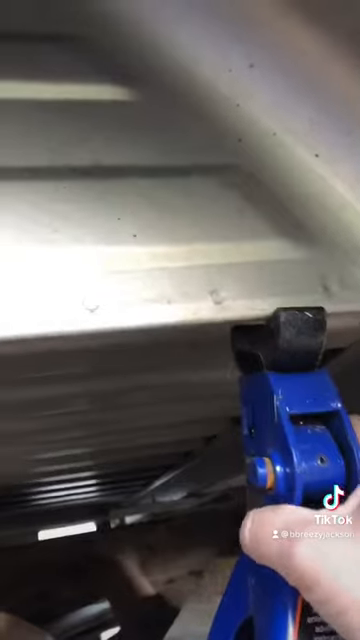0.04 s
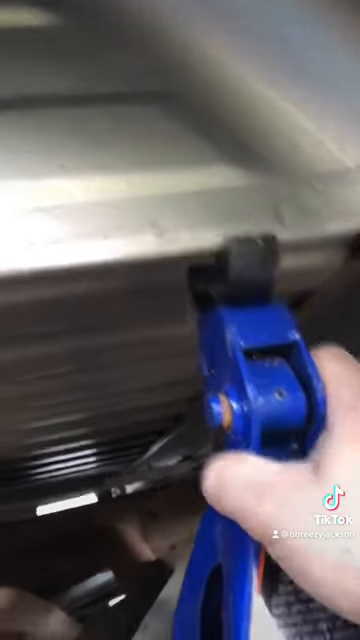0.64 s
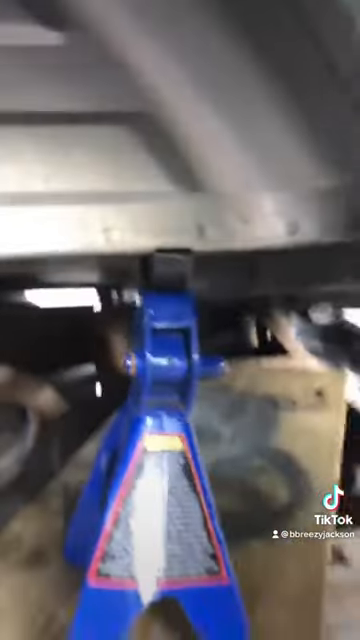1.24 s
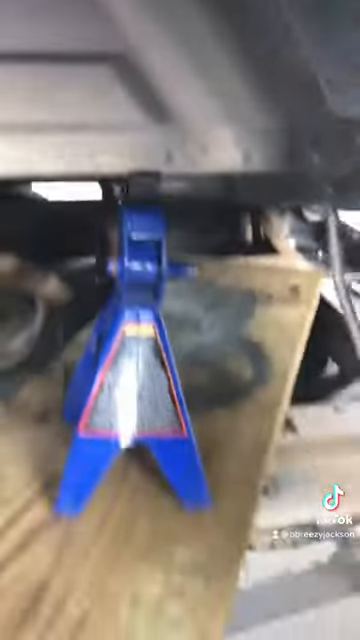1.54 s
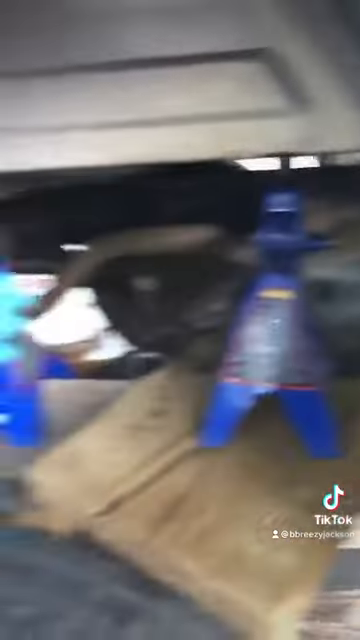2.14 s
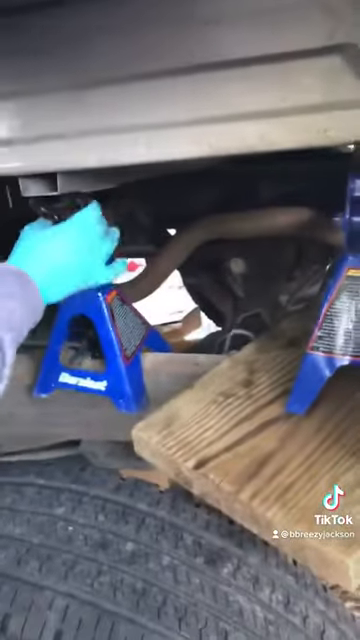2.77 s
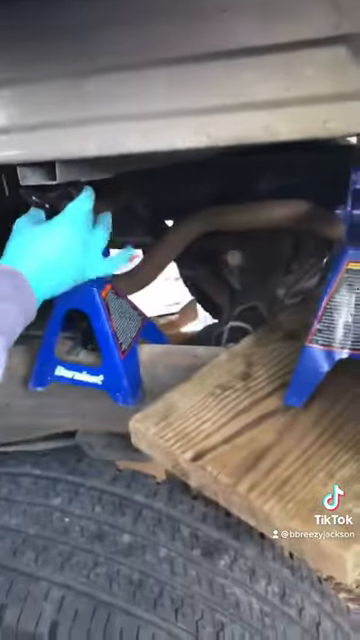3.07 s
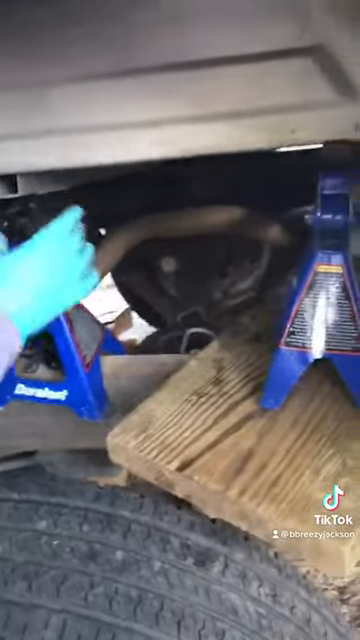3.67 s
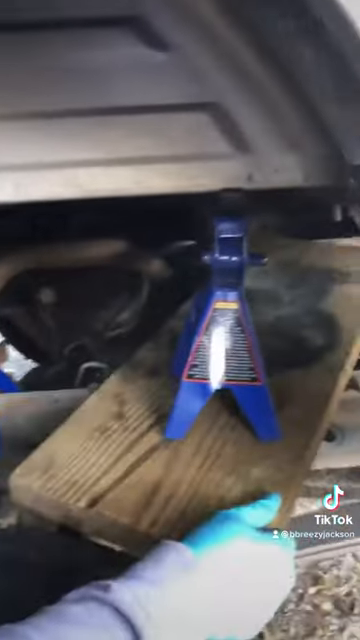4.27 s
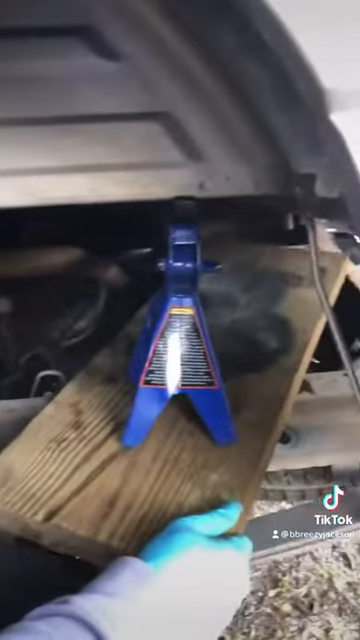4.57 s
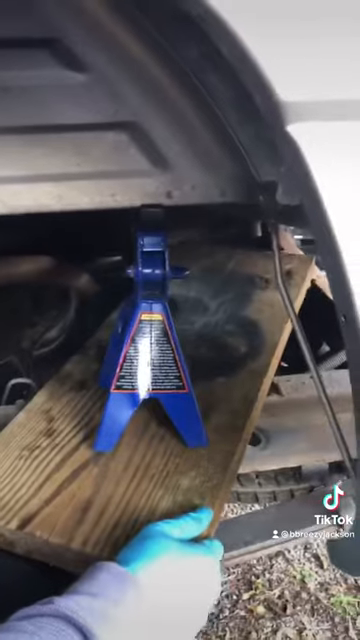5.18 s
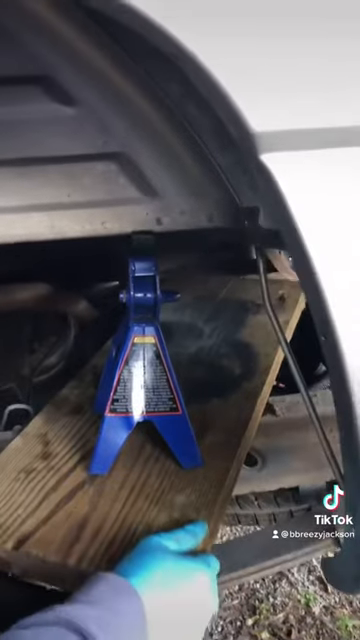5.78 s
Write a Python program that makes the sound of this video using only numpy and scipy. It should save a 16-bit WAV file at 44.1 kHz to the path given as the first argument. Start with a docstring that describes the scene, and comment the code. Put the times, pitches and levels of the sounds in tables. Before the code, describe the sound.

The sound opens with a few soft knocks and light scuffs, close by, as a steel jack stand is moved on a wooden board under a raised truck. From about 1 to 1.7 seconds the stand clunks and rattles in two quick clusters, with short ratchet pings and the sharpest clank near 1.6 seconds. A second stand knocks at about 2.3 seconds, lands with a hard ringing clunk at 3 seconds and clunks again near 3.4. Each impact dies away quickly with a slight hollow ring. The board then takes over, with brief scuffs and dull, low thuds at about 3.5 and 4.2 seconds, and three more between 5.2 and 5.8, the middle one strongest. A quiet outdoor rumble continues throughout, with very faint pulsing insect trills and a distant bird whistling near 0.5, 2.1 and 5.2 seconds.

```python
"""Steel jack stands clunk and rattle as they are shifted on a board under a raised truck, close by.
Each impact excites damped modes of the steel and of the underbody panels; a ratchet pawl pings.
The board thuds in bending and scuffs by stick-slip friction, and the underbody reflects its thuds.
Behind them, insects trill in pulses and a far bird whistles over a low outdoor rumble."""
import sys
import numpy as np
from scipy import signal
from scipy.fft import rfft, irfft
from scipy.io import wavfile
from scipy.ndimage import uniform_filter1d

SR = 44100
rng = np.random.default_rng(int(sys.argv[2]) if len(sys.argv) > 2 else 0)


def generate_wav(signal):
    """Clip the signal to [-1, 1] and save it as 16-bit WAV at the path in sys.argv[1]."""
    frames = np.transpose(np.atleast_2d(signal))
    scaled = np.clip(frames, -1, 1) * 32767
    pcm = np.round(scaled).astype(np.int16)
    wavfile.write(sys.argv[1], SR, pcm)


N = 261098
BANDS_HZ = np.geomspace(40, 16000, 22)


# impacts: t/s, level/dB, weight on the board/dB, brightness/(dB/octave), favoured mode f/Hz
BLOWS = [(0.097, -43, 2, -2.5, 165), (0.374, -34, -8, -3, 724), (0.913, -33.5, -12, -6, 812),
         (1.034, -28.5, 4, 1, 133), (1.044, -17.5, -3, 4, 400), (1.059, -16, 3.5, 4.5, 352),
         (1.082, -20, -3, -5.5, 353), (1.147, -26.5, -2, -2, 214), (1.244, -22, -3, -.5, 171),
         (1.276, -16.5, -4, -7, 818), (1.437, -33, 3, -2.5, 203), (1.455, -24.5, -3, -5.5, 259),
         (1.474, -21.5, 2, 4.5, 670), (1.519, -32, 8, -5.5, 163), (1.56, -24.5, 1.5, -1.5, 145),
         (1.587, -19.5, -1.5, 5.5, 1257), (1.604, -13, -6, 3, 1330), (1.628, -21, -5, 1, 570.5),
         (1.645, -22.5, -1, -1, 254), (2.256, -29, 1, -1, 829), (2.265, -21.5, -3, -3.5, 703),
         (2.763, -42, 1, -2.5, 324), (2.811, -41.5, 0, 7, 751), (2.825, -48, 7, 10.5, 2020),
         (2.911, -37.5, 0, -6.5, 324), (3.014, -18, -1, 1.5, 1107), (3.021, -14.5, -10, -2, 1060),
         (3.328, -29, -1, -7, 650), (3.355, -20, -7.5, -2, 799), (3.485, -34.5, 3.5, 1.5, 190)]
# force spectra of the near stand, which slides, and the far one, set down hard: f/Hz, level/dB
NEAR_FORCE = [(220, -1), (400, 2.5), (680, 0), (1100, -4), (1650, -7), (2300, -18.5), (3300, -24.5),
              (5000, -31), (9000, -31.5)]
FAR_FORCE = [(130, -1), (240, 1.5), (400, -1), (680, 2), (1100, 2), (1650, -5.5), (2600, -17), (4000, -32),
             (9000, -35)]
# how far weight on the board lifts each band: f/Hz, share
WEIGHT_SHARE = [(220, 1), (680, 0)]
# modes of a stand on its board: f/Hz, level/dB, unloaded T60/s
STAND_MODES = [(166.7, -8, 0.54), (248.9, 3.5, 0.21), (317, -27, 0.75), (353, -5.5, 0.25), (422, -16, 0.49),
               (557, -26.5, 0.12), (712, -17, 0.38), (820, -17.5, 0.1), (843, -25, 0.14),
               (1039, -20.5, .25), (1346, -7.5, 0.1), (1620, -13.5, 0.15), (1750, -16, 0.33),
               (2146, -10, 0.11), (2640, -22, 0.059), (2800, -11, 0.052), (3270, -8, .15),
               (3400, -12, 0.12), (3600, -9, 0.2), (4720, -14.5, 0.11), (6300, -29, 0.16),
               (6980, -15.5, 0.11)]
# dense response of stand, board and body panels: f/Hz, band level/dB
PANEL_BANDS = [(45, -26), (80, -20), (120, -12.5), (170, -2), (260, -6), (450, -13.5), (800, -8.5),
               (1400, -11), (2400, -6.5), (3500, -2), (5200, -12), (8000, -19), (12000, -34.5),
               (15000, -42)]
# strength of the mode favoured by the point of contact: f/Hz, level/dB
FAVOURED_GAIN = [(200, -2), (730, -2.5), (1900, -9.5)]

def stands(far_from_s=2.0, load_t60_scale=.86, chatter_hz=130, chatter_s=.12):
    """Impact excitation: the force spectrum of each blow weights the modes of steel and panels."""
    out, t = np.zeros(N), clock(1)
    octaves = np.log2(np.clip(BANDS_HZ, 687, 4000) / 687)  # contact hardness tilts this range
    for s, level, weight, bright, favoured_hz in BLOWS:
        contact, quickest_s = (NEAR_FORCE, .003) if s < far_from_s else (FAR_FORCE, .0018)
        force_db = level + read(contact, BANDS_HZ) + bright * octaves
        force_db += weight * read(WEIGHT_SHARE, BANDS_HZ)
        drive = list(zip(BANDS_HZ, force_db - 5.5))
        # dull blows press in slowly, bright ones graze before they land
        rise = quickest_s + .0005 * max(-bright, 0) + .0003 * max(bright, 0)
        chatter_db = hiss(len(t), 0, chatter_hz) * np.exp(-t / chatter_s)  # the loose post rattles
        panels = dense_modes(force_db + read(PANEL_BANDS, BANDS_HZ), rise, load_t60_scale, early_t60=.1)
        add(out, s, amp(chatter_db - 4.5) * panels)
        for k, (hz, db, t60) in enumerate(STAND_MODES):  # neighbouring modes swing in antiphase
            add(out, s, mode(hz, db + read(drive, hz), t60 * load_t60_scale, rise, turns=k / 2))
        favoured_db = read(FAVOURED_GAIN, favoured_hz) + read(drive, favoured_hz)
        add(out, s, mode(favoured_hz, favoured_db, .21 * load_t60_scale, rise, turns=1 / 4))
    return out


def mode(hz, db, t60, rise, turns):
    """Damped harmonic oscillator: it builds up, then decays exponentially; turns is its initial phase."""
    t = clock(1)
    swell = 1 - np.exp(-(t / (rise + 1 / hz)) ** 2)
    return swell * amp(db - 60 * t / t60) * np.sin(2 * np.pi * (hz * t + turns))


# ring between ground and underbody: f/Hz, unscaled T60/s
RING_DECAY = [(100, 0.72), (260, 0.83), (700, 0.48), (1840, 0.25), (4850, 0.18), (12000, 0.26)]

def dense_modes(levels_db, rise, t60_scale, early_t60, early_db=2, uneven_db=5, cluster_hz=70):
    """Modal overlap: countless close modes merge into noise bands, a quick burst over a longer ring."""
    t, bins, hz = clock(1), SR // 2, BANDS_HZ[:, None]
    index = np.arange(len(BANDS_HZ))
    place = np.interp(np.log(np.arange(bins) + 1), np.log(BANDS_HZ), index)
    band_share = np.maximum(1 - abs(place - index[:, None]), 0)
    # each point of contact favours other clusters of the higher modes
    clusters = unit(uniform_filter1d(rng.standard_normal(bins), cluster_hz))
    clusters *= np.minimum(np.arange(bins) / 1000, 1)
    spectrum = amp(uneven_db * clusters) * np.exp(2j * np.pi * rng.random(bins))
    swell = 1 - np.exp(-(t / (rise + .58 / hz)) ** 2)  # low modes take longer to build up
    ring = amp(-60 * t / (t60_scale * read(RING_DECAY, hz)))
    burst = amp(early_db - 60 * t / early_t60)
    envelope = swell * (ring + burst) / (1 + amp(early_db))
    bands = irfft(np.sqrt(band_share) * spectrum, SR) * envelope
    bands *= np.sqrt((envelope ** 2).sum(1) / (bands ** 2).sum(1))[:, None]  # the envelope sets the energy
    return amp(levels_db) @ bands


# soft blows on the board: t/s, level/dB
BOARD_THUDS = [(0.150, -35.5), (0.418, -29.5), (0.626, -32.5), (1.063, -24.5), (3.492, -21.5), (4.016, -34),
               (4.2037, -16.5), (5.2612, -20), (5.4871, -11.5), (5.741, -18.5)]
# ring after a thud: f/Hz, band level/dB
THUD_BANDS = [(45, -9.5), (75, -14), (140, 1.5), (220, -11), (320, -5.5), (480, -17), (800, -25),
              (1500, -41.5), (4000, -71)]

def board(swing_hz=(113, 215), lowest_hz=146, lowest_t60=.67, echo_s=.028, echo_db=-15):
    """Flexural vibration: a tapped plank makes a few damped swings; the underbody echoes and drones."""
    out, t = np.zeros(N), clock(.88)
    bending = signal.butter(3, swing_hz, "band", fs=SR, output="sos")
    swing = signal.sosfilt(bending, signal.unit_impulse(len(t)))
    swing /= abs(swing).max()
    hum = amp(-19 - 60 * t / lowest_t60) * np.sin(2 * np.pi * lowest_hz * t)  # lowest mode of the plank
    hum *= 1 - np.exp(-t * lowest_hz / 2)
    for s, db in BOARD_THUDS:
        add(out, s, tick(db - 28, hz=740, t60=.06))
        add(out, s, amp(db) * (swing + hum))
        add(out, s + echo_s, amp(db + echo_db) * swing)
        drone_db = db - 9 + read(THUD_BANDS, BANDS_HZ)
        add(out, s + .00411, dense_modes(drone_db, rise=.0028, t60_scale=.92, early_t60=.054))
    return out


# pings of the ratchet pawl and loose steel: t/s, f/Hz, level/dB, T60/s
STEEL_PINGS = [(1.48, 2676, -37.5, .14), (1.612, 1338, -21, .12), (1.628, 4730, -43, .15),
               (2.814, 4900, -59, .18), (2.823, 3830, -53, .12), (3.016, 2130, -25.5, .05),
               (3.359, 1340, -33, .2), (3.491, 2950, -45.5, .05), (3.494, 3480, -56, .12),
               (5.030, 1430, -52, .13)]
# ticks of grit and loose parts: t/s, level/dB, f/Hz, T60/s
GRIT_TICKS = [(1.048, -49, 7400, .11), (2.082, -46.5, 645, 0.06), (2.131, -29, 1060, 0.009),
              (2.549, -49, 1490, 0.018), (2.826, -66, 7000, .13), (3.807, -41.5, 1044, 0.13),
              (3.848, -46, 1100, 0.12)]

def small_parts(contact_s=.0008):
    """Free vibration: pawl and loose steel ring in one mode per ping, while grit ticks dryly."""
    out, t = np.zeros(N), clock(.42)
    onset = 1 - np.exp(-(t / contact_s) ** 2)
    for s, hz, db, t60 in STEEL_PINGS:
        add(out, s, onset * amp(db - 60 * t / t60) * np.sin(2 * np.pi * hz * t))
    for s, db, hz, t60 in GRIT_TICKS:
        add(out, s, tick(db, hz, t60))
    return out


def tick(db, hz, t60, snap_db=-16, snap_width_hz=1700, contact_s=.00038):
    """Contact transient: a decaying burst of noise around one pitch, with a broadband snap."""
    t = clock(.42)
    burst = hiss(len(t), hz, hz / 4) + amp(snap_db) * hiss(len(t), hz, snap_width_hz)
    onset = 1 - np.exp(-(t / contact_s) ** 2)
    return onset * amp(db - 60 * t / t60) * burst


# pushes that scuff wood and sleeve: t/s, rise/s, level/dB, tilt/(dB/octave)
PUSHES = [(0.361, 0.27, -59.5, 7.5), (0.601, 0.18, -60, 8.5), (2.779, 0.1, -51, -3.5),
          (3.369, .03, -46.5, -1.5), (4.07, 0.031, -49, -11), (4.144, .02, -54, 2.5),
          (4.211, 0.05, -46, -3), (4.39, 0.039, -42, -17), (5.566, 0.024, -38.5, -1)]
# friction noise: f/Hz, relative spectral level/dB
FRICTION_SPECTRUM = [(210, -24), (350, -9), (457, -7.5), (499, -10.5), (850, -0.5), (986, -6), (1810, -13),
                     (3410, -30.5), (12000, -64), (15600, -80), (22000, -120)]

def scuffs(slips_per_s=3000, uneven_db=.5):
    """Stick-slip friction: tiny slips of uneven size swell and fade with each push."""
    out, t, hz = np.zeros(N), clock(1), np.fft.rfftfreq(SR, 1 / SR)
    for s, rise, db, tilt in PUSHES:
        slips = rng.standard_normal(SR) * amp(uneven_db * np.minimum(rng.exponential(1, SR), 4))
        slips *= rng.random(SR) < slips_per_s / SR
        colour_db = read(FRICTION_SPECTRUM, hz) + tilt * np.log2(np.clip(hz, 200, 6000))
        rub = unit(irfft(rfft(slips) * amp(colour_db), SR))
        fade_s = .057 + .22 * rise  # slow pushes also die away slowly
        envelope = np.minimum(t / rise, 1) ** .39 * np.exp(-np.maximum(t - rise, 0) / fade_s)
        add(out, s, amp(db) * rub * envelope)
    return out


# slurred whistles: start t/s, end t/s, first f/Hz, last f/Hz, level/dB, phase blur/rad
BIRD_WHISTLES = [(0.45, 0.627, 3270, 3380, -66, 1.8), (2.08, 2.285, 3500, 3175, -62.5, .55),
                 (5.13, 5.56, 3700, 3030, -70.5, 1.2)]

def bird(blur_hz=110, lower_ratio=.76, lower_db=-11, flutter_hz=25):
    """Frequency modulation: a whistle and a weak lower voice glide linearly; distance blurs both."""
    out = np.zeros(N)
    for start, end, first_hz, last_hz, db, blur in BIRD_WHISTLES:
        size = len(clock(end - start))
        phase = 2 * np.pi * np.cumsum(np.linspace(first_hz, last_hz, size)) / SR
        upper = np.sin(phase + blur * hiss(size, 0, blur_hz))
        lower = np.sin(lower_ratio * phase + blur * hiss(size, 0, blur_hz))
        swell = np.sin(np.pi * np.linspace(0, 1, size) ** 1.2)  # peaks just past the middle
        flutter = amp(2 * blur * hiss(size, 0, flutter_hz))
        add(out, start, amp(db) * swell * unit(flutter * (upper + amp(lower_db) * lower)))
    return out


# trills: t/s, f/Hz, level/dB
INSECT_TRILLS = [(0.18, 4140, -73.5), (1.3, 4280, -77), (2.12, 3950, -74), (3.23, 4180, -76.5),
                 (4.17, 3950, -78), (4.53, 4290, -80), (5.76, 3950, -78)]

def insects(trill_s=.48, pulse_hz=39.5, blur_rad=1.1):
    """Amplitude modulation: wing strokes pulse each trill, over a faint steady chorus."""
    out = amp(-79) * hiss(N, hz=4420, width_hz=230)  # the chorus
    t = clock(trill_s)
    wings = 1 + .62 * np.cos(2 * np.pi * pulse_hz * t)
    swell = signal.windows.tukey(len(t), .3)
    for s, hz, db in INSECT_TRILLS:
        tone = np.sin(2 * np.pi * hz * t + blur_rad * hiss(len(t), 0, width_hz=100))
        add(out, s, amp(db) * unit(wings * tone) * swell)
    add(out, 4.63, amp(-75.5) * hiss(len(t), hz=2605, width_hz=300) * swell)  # one lower, toneless rasp
    return out


# outdoor rumble and thin hiss: f/Hz, relative spectral level/dB
AIR_SPECTRUM = [(15, -36.5), (25, -5.5), (129, 0.5), (761, -21), (870, -16.5), (995, -18.5), (1370, -22),
                (1490, -26), (3620, -38.5), (4370, -40.5), (5130, -43), (15500, -53)]

def air(level_db=-47.5, cavity_hz=158, cavity_width_hz=32, cavity_db=5):
    """Cavity resonance: the hollow under the truck lifts one low band of the outdoor noise."""
    hz = np.fft.rfftfreq(N, 1 / SR)
    colour_db = read(AIR_SPECTRUM, hz) + cavity_db * np.exp(-((hz - cavity_hz) / cavity_width_hz) ** 2)
    return amp(level_db) * unit(irfft(rfft(rng.standard_normal(N)) * amp(colour_db), N))


def hiss(size, hz, width_hz):
    """Band-limited noise: a Gaussian band at rms 1."""
    f = np.fft.rfftfreq(size, 1 / SR)
    band = np.exp(-((f - hz) / width_hz) ** 2)
    return unit(irfft(rfft(rng.standard_normal(size)) * band, size))


def amp(db):
    """Decibels to amplitude ratio."""
    return 10 ** (np.asarray(db) / 20)


def unit(x):
    """Normalisation to rms 1."""
    return x / np.sqrt(np.mean(x ** 2) + 1e-20)


def read(points, hz):
    """Interpolation on a log-frequency axis."""
    f, value = np.transpose(points)
    return np.interp(np.log(hz + 1), np.log(f + 1), value)


def clock(length_s):
    """Uniform sampling times."""
    return np.arange(int(length_s * SR)) / SR


def add(mix, s, sound):
    """Superposition of a sound on the mix at time s."""
    part = mix[max(round(s * SR), 0):][:len(sound)]
    part += sound[:len(part)]


def scene():
    """Linear superposition: all sources sum at one microphone."""
    return (stands() + board() + small_parts() + scuffs() + bird() + insects() + air())[None]


def record(dry, low_cut_hz=41, high_cut_hz=15200):
    """Band limiting: the microphone sheds deep bass, the ends are softened and the top treble is cut."""
    thin = signal.sosfilt(signal.butter(4, low_cut_hz, "high", fs=SR, output="sos"), dry)
    thin *= signal.windows.tukey(N, .001)
    low_pass = signal.firwin(511, high_cut_hz, window=("kaiser", 9), fs=SR)
    return signal.oaconvolve(thin, low_pass[None], "same")


dry = scene()
out = record(dry)
generate_wav(out)
```